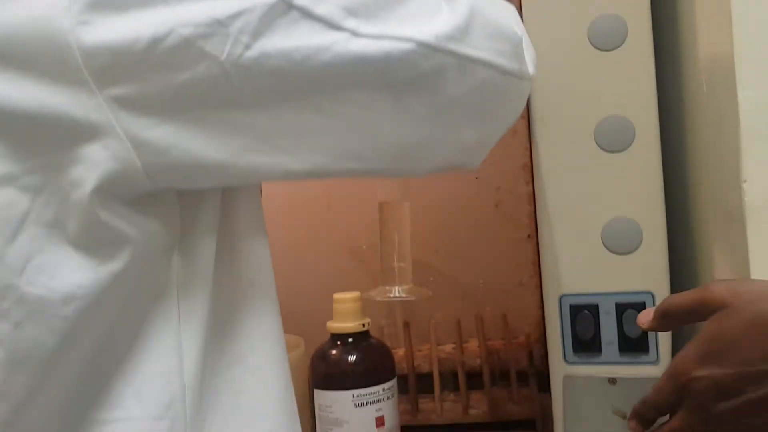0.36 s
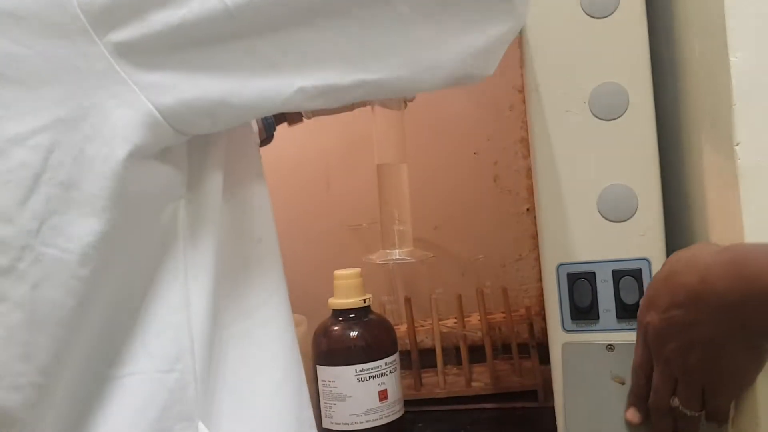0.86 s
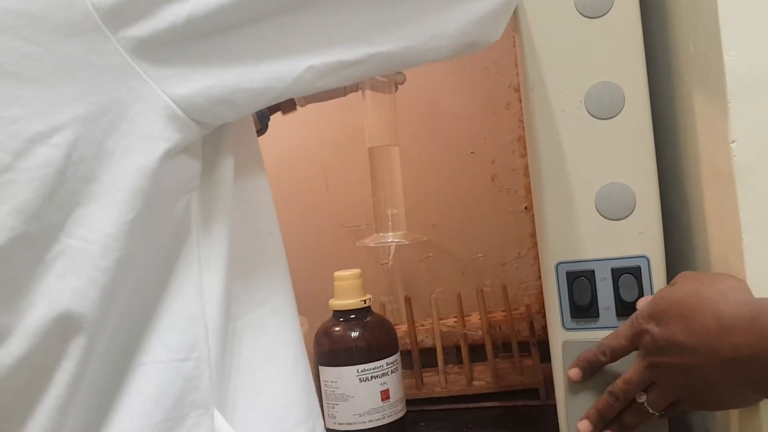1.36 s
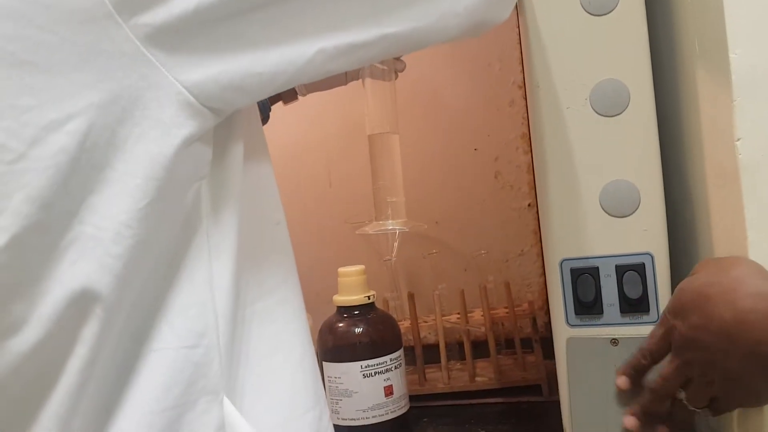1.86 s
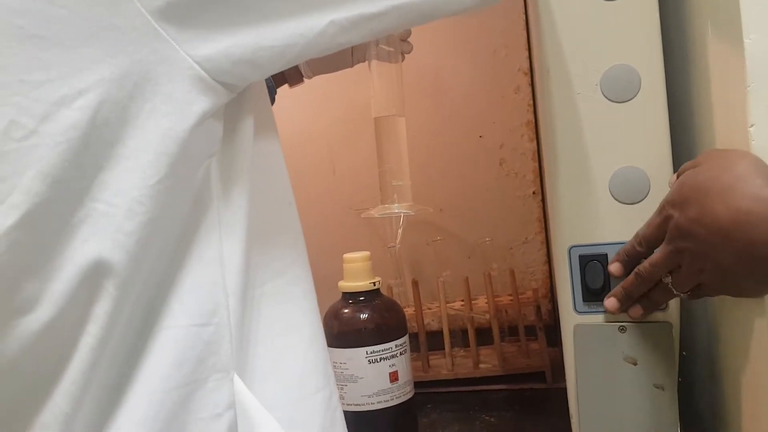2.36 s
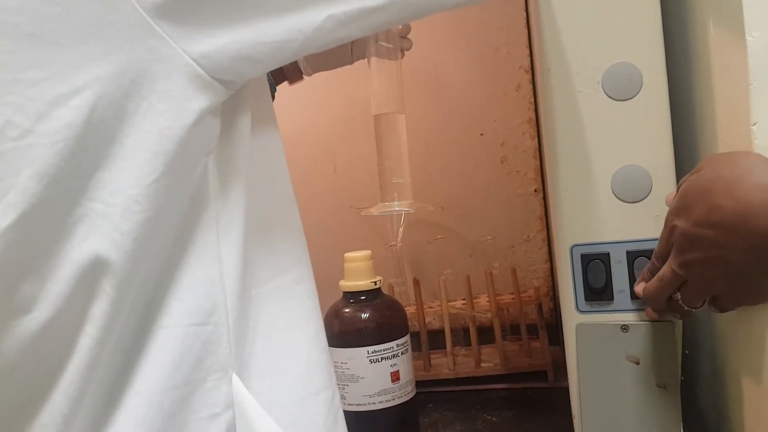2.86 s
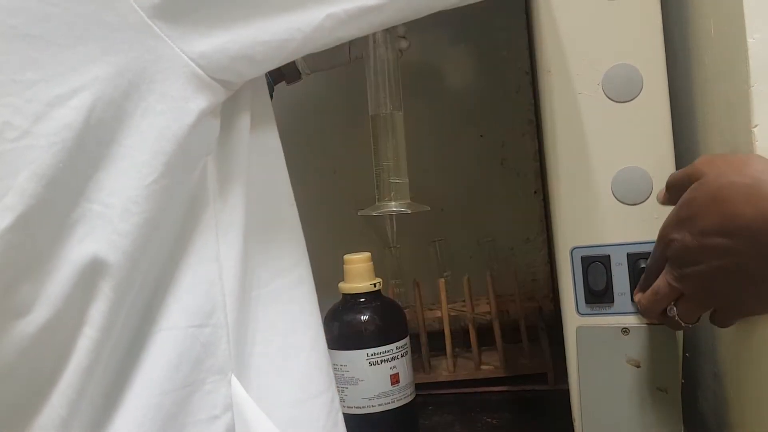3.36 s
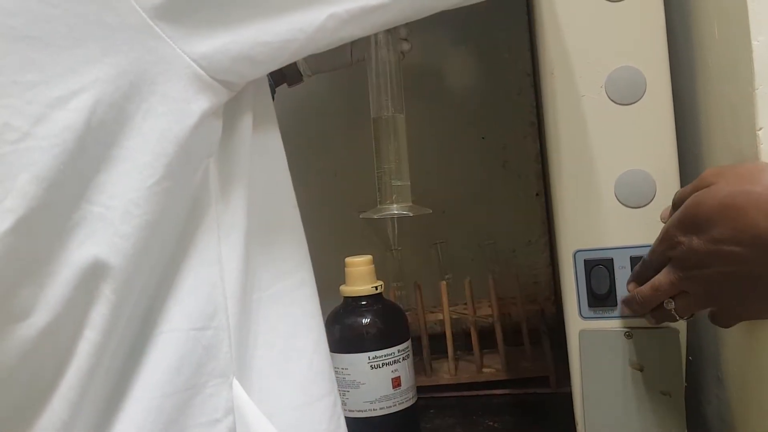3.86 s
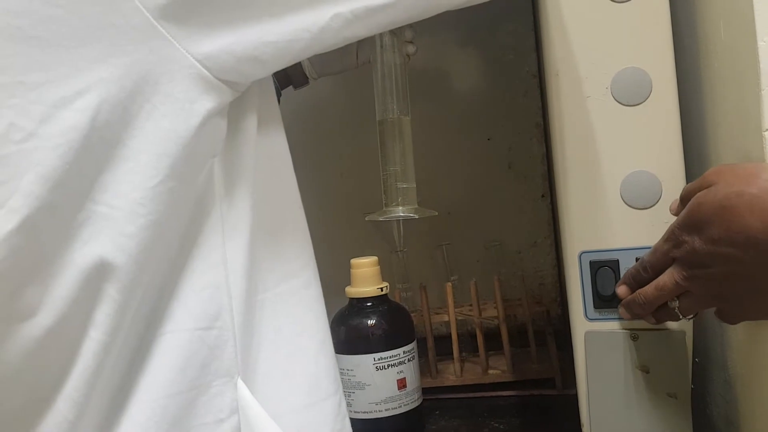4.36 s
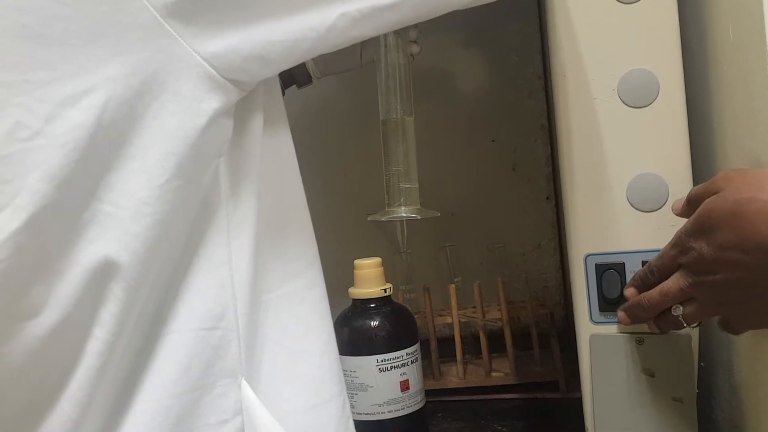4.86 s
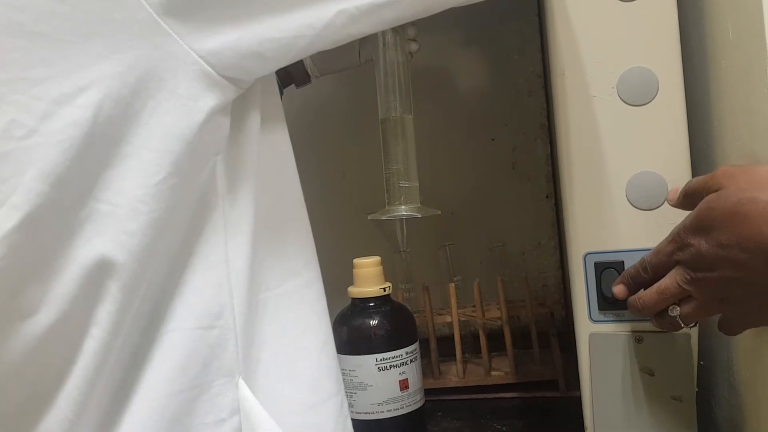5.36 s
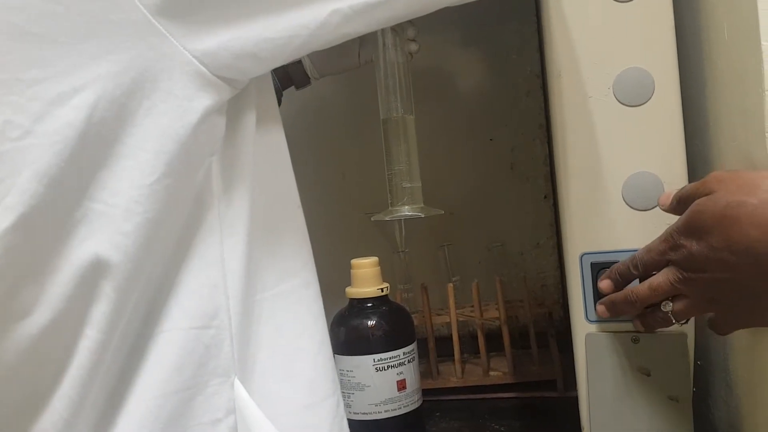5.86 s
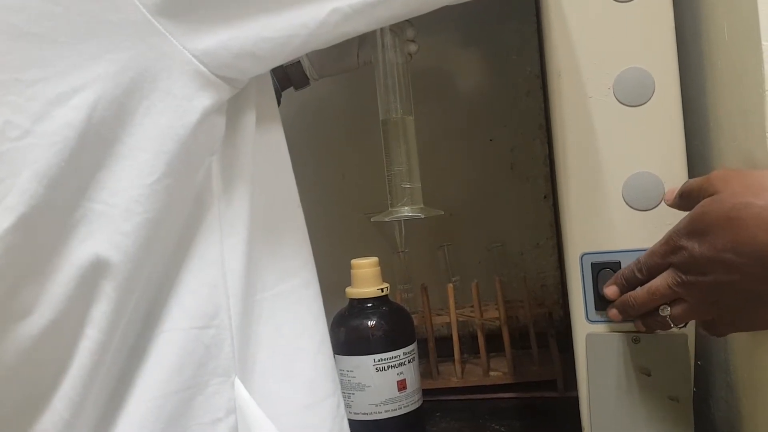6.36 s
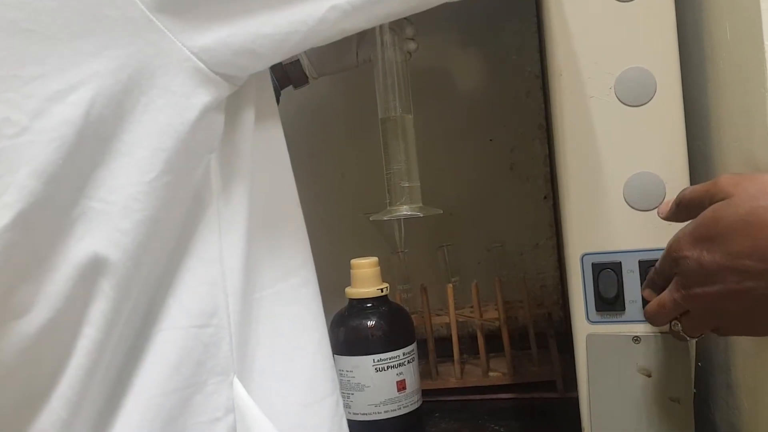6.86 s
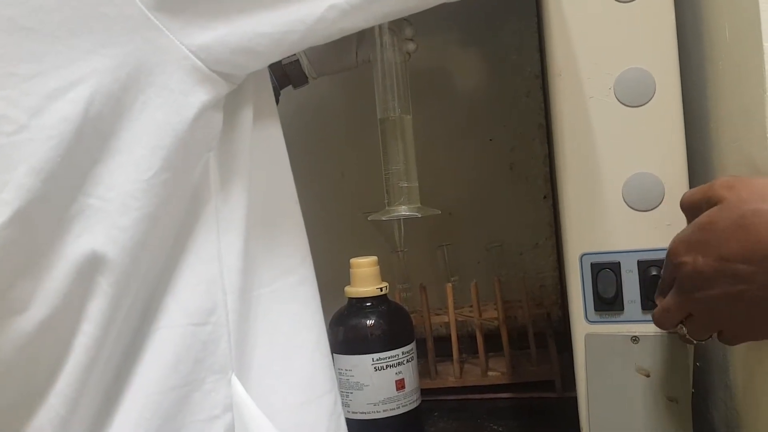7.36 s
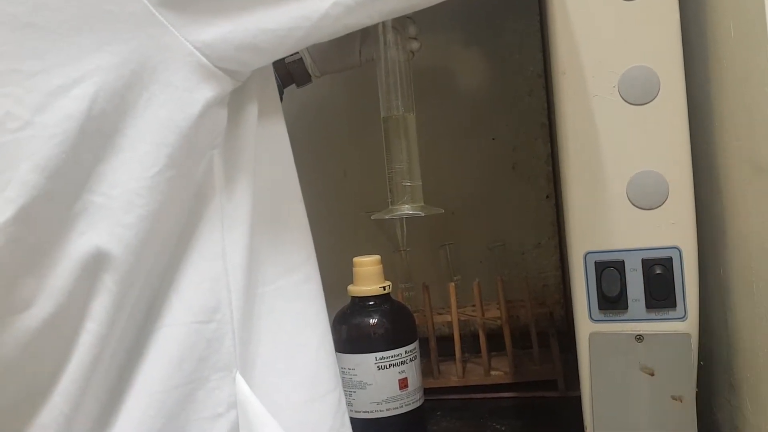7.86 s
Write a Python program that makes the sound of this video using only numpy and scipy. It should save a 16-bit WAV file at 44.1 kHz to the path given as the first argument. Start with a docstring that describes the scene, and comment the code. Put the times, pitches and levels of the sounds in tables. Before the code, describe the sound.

Low, bassy fan hum with a gentle fast flutter and muffled airflow fills a small hard laboratory, heard close in stereo. A dying click opens it, followed by a quiet thud and faint fabric rustles. A barely audible tick precedes one crisp, hard switch snap near three seconds, with short plastic and panel ringing and a brief bright room tail. Afterwards only the continuing fan and a few very faint cloth swishes remain.

```python
"""In a laboratory fume cupboard an extraction fan runs: sine hum and a blade tone with a slight regular wobble, its
level beating by chance with nearby noise, over noise with peaks and dips. A rocker switch snaps once, a noisy crack
and short housing modes ringing off the hard room; a faint tick comes before it, and a snap from before the start is
still dying. A soft bump, one dull mode, sounds early on. Cloth swishes faintly as swells of high hiss.
Two microphone ports hear it, the right with a deep treble notch."""
import sys
import numpy as np
from scipy import signal
from scipy.fft import rfft, irfft, next_fast_len
from scipy.io import wavfile
from scipy.ndimage import uniform_filter1d

SR = 44100
rng = np.random.default_rng(int(sys.argv[2]) if len(sys.argv) > 2 else 0)


def digitize_waveform(pressure):
    """Quantize a signal to 16-bit integers and store it at the path in sys.argv[1].

    Rows of a 2-D input are taken as channels; values are limited to [-1, 1].
    """
    field = np.atleast_2d(pressure).T
    bounded = np.clip(field, -1, 1)
    quanta = np.round(bounded * 32767).astype(np.int16)
    wavfile.write(sys.argv[1], SR, quanta)


def amplitude_ratio(level_db):
    """Convert a level in decibels to the matching linear amplitude (field) ratio."""
    exponent = np.asarray(level_db, float) / 20
    return 10 ** exponent


N = 351653  # length in samples


def evened(x):
    """Scales to rms 1."""
    return x / np.sqrt(np.mean(x ** 2) + 1e-20)


def read(points, hz):
    """Reads a (Hz, value) table on a log frequency axis."""
    f, value = np.transpose(points)
    return np.interp(np.log(hz + 1), np.log(f + 1), value)


def causal(points):
    """Minimum-phase filter with the given (Hz, dB) colour: its energy comes as early as possible."""
    log_gain = np.log(amplitude_ratio(read(points, abs(np.fft.fftfreq(8192, 1 / SR)))))
    return np.fft.ifft(np.exp(np.conj(signal.hilbert(log_gain)))).real[:2048]


# Fan tones: twice the mains, blade passing, two mains overtones. Each row: frequency in Hz.
MOTOR_TONES_HZ = [100.03, 189.87, 300.15, 500.2]
# Their levels before beating and wobble. Each row: left level in dB rms, right level in dB rms.
MOTOR_TONES_DB = [(-27, -27), (-33.5, -33.5), (-53.5, -52), (-52, -52.5)]
# Slow wobble of the drive, one row per tone. Each row: level swing as a share, its peak in seconds,
# phase swing in radians, its peak in seconds.
DRIVE_WOBBLE = [(.07, .114, .16, .211), (.2, .193, .26, .235), (0, 0, 0, 0), (0, 0, 0, 0)]
WOBBLE_HZ = 3.775
# Blade tone level over time: chance rises and dips as it beats with the noise around it.
# Each row: centre in seconds, change in dB, half-width in seconds (where the change is down to 1/e).
BLADE_TONE_BEATING = [(.38, 6, 0.063), (.95, 3.5, .1), (1.95, -5, 0.074), (2.34, 8, 0.056),
                      (2.86, 5.5, 0.12), (3.35, -10.5, 0.18), (3.7, 5.5, 0.084), (3.92, 7.5, 0.077),
                      (4.63, 10, 0.078), (5.12, 5, 0.16), (6.5, 8, 0.051), (6.83, 4.5, .1), (7.1, 3.5, .05),
                      (7.38, 4.5, 0.055), (7.64, 3.5, 0.035), (7.94, 9, 0.026)]


def motor():
    """Clean sines: the iron hums at even multiples of the mains, the blades beat at their own rate; both wobble."""
    t = np.arange(N) / SR
    blade_db = sum(db * np.exp(-((t - s) / half) ** 2) for s, db, half in BLADE_TONE_BEATING)
    beating_db = [0, blade_db, 0, 0]
    out = np.zeros((2, N))
    for hz, sides_db, beat_db, wobble in zip(MOTOR_TONES_HZ, MOTOR_TONES_DB, beating_db, DRIVE_WOBBLE):
        swing, swing_s, rad, rad_s = wobble
        level = amplitude_ratio(beat_db) * (1 + swing * np.cos(2 * np.pi * WOBBLE_HZ * (t - swing_s)))
        phase = 2 * np.pi * (hz * t + rng.random())
        phase += rad * np.cos(2 * np.pi * WOBBLE_HZ * (t - rad_s))
        peak = np.sqrt(2) * amplitude_ratio(sides_db)[:, None]
        out += peak * level * np.sin(phase)
    return out


# Likeness of diffuse sound at the two ports. Each row: frequency in Hz, left-right correlation (-1 to 1).
PORT_LIKENESS = [(60, 0.93), (95, 0.93), (150, 1), (240, 0.99), (380, 0.82), (600, 0.66), (950, 0.45),
                 (1500, -0.29), (2380, 0.47), (3770, -0.16), (5980, 0.35), (9470, -0.84), (15000, 0.12)]


def likened(left, other, same):
    """Mixes independent noises into a right side that resembles the left by the given correlation."""
    return same * left + np.sqrt(1 - same ** 2) * other


# Colour of the moving air. Each row: frequency in Hz, relative density in dB per Hz.
AIR_COLOUR = [(25, -31), (45, -10.5), (75, -3.5), (130, 1), (230, -6), (340, -9.5), (430, -18.5),
              (800, -23), (1500, -24.5), (2400, -32.5), (4000, -38.5), (6500, -43), (10000, -49.5),
              (13000, -49.5), (16000, -73)]
# Peaks and dips in the air noise, including the noise band around the blade tone.
# Each row: frequency in Hz, width in Hz, left height in dB over the air, right height in dB over the air.
AIR_PEAKS_AND_DIPS = [(71.4, 5.5, 7.5, 7.5), (94, 4, -5.5, -4.5), (119, 6, 3, 5.5), (161.1, 8, 11, 7),
                      (165, 3.4, -12, -15.5), (193, 2.6, 4, 6), (196.8, 8.5, -0.5, 5), (222, 15.7, 6, 2.5),
                      (260.6, 11, -1, 3), (296.4, 5.3, 8.5, 3), (330, 9.4, 0.5, 2), (409, 8.6, 6, -2.5),
                      (463, 16, 6.5, 2.5), (410, 12, 1.5, 0.5), (558.4, 22, 9, 1), (602.7, 20, 9, 1),
                      (654, 18, 4.5, 1.5), (704, 30, 11, 10), (729, 14, 0.5, 8.5), (902, 28, 4.5, 8.5),
                      (954, 6.5, 13.5, 5.5), (1196, 50, 6.5, 9.5), (1342, 8.9, 8.5, -14),
                      (2033, 18, 8, 9.5)]
# The fan draws a little harder as time goes on. Each row: time in seconds, air flow level in dB.
AIR_FLOW = [(0, -0.1), (1.6, -.2), (2.4, .5), (3.2, 0.46), (4.3, 0.5), (5.5, 0.5), (6.8, .8), (7.97, 0.5)]
AIR_DB = -28.5  # dB rms before the flow


def air():
    """Turbulent noise with peaks and dips; the bass is alike at both ports, the treble likeness wanders."""
    size = next_fast_len(N)
    hz = np.fft.rfftfreq(size, 1 / SR)
    left, other = rfft(rng.standard_normal((2, size)))
    same = np.clip(read(PORT_LIKENESS, hz), -1, 1)
    pair = np.array([left, likened(left, other, same)])
    shape_db = np.zeros((2, len(hz)))
    for f, width, left_db, right_db in AIR_PEAKS_AND_DIPS:
        hump = 1 / (1 + (2 * (hz - f) / width) ** 2)
        shape_db += np.array([[left_db], [right_db]]) * hump
    # dense smaller room modes, full strength from 1 kHz up
    ripple = uniform_filter1d(rng.standard_normal((2, len(hz))), 120, axis=1)
    shape_db += 2.0 * evened(ripple) * np.clip(hz / 1000, 0, 1)
    noise = irfft(pair * amplitude_ratio(read(AIR_COLOUR, hz) + shape_db), size)[:, :N]
    flow_db = np.interp(np.arange(N) / SR, *np.transpose(AIR_FLOW))
    return amplitude_ratio(AIR_DB + flow_db) * evened(noise)


# Decay of the hard room. Each row: frequency in Hz, t60 in seconds.
ROOM_DECAY = [(500, 0.31), (1320, 0.59), (2200, 0.5), (3480, 0.51), (9190, 0.3)]


def room():
    """Sparse taps of random sign, strong at first from the near cupboard, each band dying at its own speed."""
    crowd_s, early_db, early_s = 0.0026, 4, 0.017  # build-up time, early boost and its fall time
    taps = np.zeros((2, SR // 2))
    slots = np.arange(60, SR // 2 - 12, 12)
    at = slots + rng.integers(0, 12, (2, len(slots)))
    np.put_along_axis(taps, at, rng.choice([-1., 1.], at.shape), 1)
    hz, t, z = signal.stft(taps, SR, nperseg=128)
    same = np.clip(read(PORT_LIKENESS, hz), -1, 1)[:, None]
    z[1] = likened(z[0], z[1], same)
    decay_db = -60 * t / read(ROOM_DECAY, hz)[:, None]
    tail = signal.istft(z * amplitude_ratio(decay_db), SR, nperseg=128)[1]
    s = np.arange(tail.shape[1]) / SR
    tail *= (1 - np.exp(-s / crowd_s)) * amplitude_ratio(early_db * np.exp(-s / early_s))
    return tail / np.linalg.norm(tail[0])


# Switch snaps and a small tick. Each row: start in seconds, relative level in dB,
# bounce in dB over the snap, housing ring in dB over the snap.
SWITCH_SNAPS = [(-.07, -14, -9, -23), (2.524, -42, -20, -20), (3.0945, -6.5, -21, -16.5)]
# Colour of the crack. Each row: frequency in Hz, relative level in dB.
CRACK_COLOUR = [(300, -38), (600, -44), (1200, -15), (2200, -7), (2900, -6), (5000, -3.5), (6500, -8),
                (8400, -4.5), (10000, -6), (12000, -3.5), (14000, -13), (15800, -10)]
# Modes of switch housing and panel. Each row: frequency in Hz, relative level in dB, t60 in seconds.
PANEL_MODES = [(666, -14.5, .09), (772, -7, 0.063), (846, -8, 0.11), (910, -8, 0.052), (1015, -12, .05),
               (1480, -45, 0.012), (1720, -18, 0.025), (1923, -8, 0.029), (2100, -6.5, 0.019),
               (2180, -10, .013), (2210, -7, 0.016), (4170, -15, 0.016), (5350, -18, .01),
               (8450, -9.5, 0.01)]
# The large panel takes a moment to pick up the blow. Holds: pitch in Hz below which it does, rise in seconds.
PANEL_BLOOM = (1100, .003)


def switch():
    """A hard crack that chatters for a moment, a bounce of the rocker, the housing's short modes, then the room."""
    bounce_s = .0095  # delay after the snap
    t = np.arange(SR // 8) / SR
    crack = causal(CRACK_COLOUR)
    crack = crack / np.linalg.norm(crack)
    # random signs under a sharp fall and a slower one
    fall = .45 * np.exp(-t[:300] / 0.002) + np.exp(-t[:300] / 0.00014)
    chatter = rng.choice([-1., 1.], (2, 300)) * fall
    bloom_hz, bloom_s = PANEL_BLOOM
    bloom = 1 - np.exp(-(t / bloom_s) ** 2)
    ring = np.zeros(len(t))
    for hz, db, t60 in PANEL_MODES:
        mode = amplitude_ratio(db - 60 * t / t60) * np.sin(2 * np.pi * hz * t)
        ring += mode * (bloom if hz < bloom_hz else 1)
    strikes, rung = np.zeros((2, N + SR))  # one second of lead-in holds the earlier snap
    for s, db, bounce_db, ring_db in SWITCH_SNAPS:
        strikes[round((1 + s) * SR)] = amplitude_ratio(db)
        strikes[round((1 + s + bounce_s) * SR)] = amplitude_ratio(db + bounce_db)
        rung[round((1 + s) * SR)] = amplitude_ratio(db + ring_db)
    cracks = signal.oaconvolve(strikes, crack)[:N + SR]
    rings = signal.oaconvolve(rung, ring)[:N + SR]
    chattered = signal.oaconvolve(cracks[None], chatter, axes=1)[:, SR:SR + N]
    direct = amplitude_ratio(-9) * chattered + amplitude_ratio(9) * rings[SR:]
    echoes = signal.oaconvolve((cracks + rings)[None], room(), axes=1)[:, SR:SR + N]
    return direct + amplitude_ratio(13.5) * echoes


# A soft bump on the bench. Holds: start in seconds, level in dB before rise and fade,
# frequency in Hz, t60 in seconds.
BENCH_BUMP = (.312, -24, 470, .13)


def bench():
    """One dull decaying mode with a soft start, equal on both sides."""
    s, db, hz, t60 = BENCH_BUMP
    t = np.maximum(np.arange(N) / SR - s, 0)
    rise = 1 - np.exp(-t / 0.008)
    return amplitude_ratio(db - 60 * t / t60) * rise * np.sin(2 * np.pi * hz * t)


# Cloth swishes. Each row: peak time in seconds, level in dB, fall time constant in seconds.
CLOTH_SWISHES = [(.3, -58, 0.18), (1.12, -60, .08), (1.52, -57, .1), (2.11, -54.5, 0.15), (2.85, -63, .073),
                 (3.8, -65, .06), (7.06, -67, .06), (7.62, -62, 0.35)]
# Colour of the cloth hiss. Each row: frequency in Hz, relative density in dB per Hz.
CLOTH_COLOUR = [(2000, -25), (5000, -4), (8000, -8), (12000, -3), (16000, -14)]
SWISH_RISE_S = 0.054  # time constant


def cloth():
    """Rubbing fibres as soft swells of high hiss, slightly grainy."""
    t = np.arange(N) / SR
    swell = np.zeros(N)
    for s, db, fall in CLOTH_SWISHES:
        swell += amplitude_ratio(db) * np.exp(np.where(t < s, (t - s) / SWISH_RISE_S, (s - t) / fall))
    grain = amplitude_ratio(2.0 * evened(uniform_filter1d(rng.standard_normal(N), 300)))
    noise = grain * rng.standard_normal((2, N))
    hiss = signal.oaconvolve(noise, causal(CLOTH_COLOUR)[None], axes=1)[:, :N]
    return swell * evened(hiss)


def scene():
    """Fan tones, air, switch, bench and cloth."""
    return motor() + air() + switch() + bench() + cloth()


def low_pass(x):
    """Removes everything above the highest recorded frequency."""
    return signal.sosfilt(signal.butter(12, 16310, fs=SR, output="sos"), x)


# Left port: a dip below a small cavity peak. Each row: frequency in Hz, gain in dB.
LEFT_PORT_COLOUR = [(6800, 0), (7750, -3), (8300, 3), (9300, 0)]
# Right port, besides the notch. Each row: frequency in Hz, gain in dB.
RIGHT_PORT_COLOUR = [(60, -2.5), (800, 0), (1500, -3), (2500, -5.5), (4500, -6.5), (6000, -14), (7000, -12),
                     (9200, -15), (10000, -10), (10800, -4), (12500, 2.5), (14300, 5), (15300, -2)]
# Right port notch. Holds: centre in Hz, width in Hz, gain at the centre in dB.
RIGHT_NOTCH = (7950, 1500, -22)
EDGE_HZ = 15800  # upper band limit


def record(dry):
    """Each port colours its side, the right one with a notch; a steep low-pass then limits the band."""
    hz = np.geomspace(30, 20000, 400)
    centre, width, depth_db = RIGHT_NOTCH
    notch_db = depth_db * np.exp(-((hz - centre) / width) ** 2 * 2)
    right_db = read(RIGHT_PORT_COLOUR, hz) + notch_db
    right = signal.oaconvolve(dry[1], causal(list(zip(hz, right_db))))[:N]
    left = signal.oaconvolve(dry[0], causal(LEFT_PORT_COLOUR))[:N]
    edge = signal.firwin(511, EDGE_HZ, window=("kaiser", 9), fs=SR)
    mix = signal.oaconvolve(np.array([left, right]), edge[None], "same")
    return low_pass(mix)


dry = scene()
out = record(dry)
digitize_waveform(out)
```